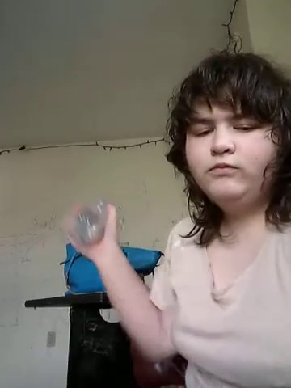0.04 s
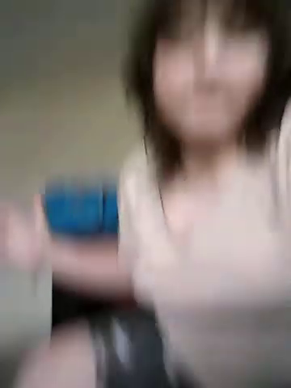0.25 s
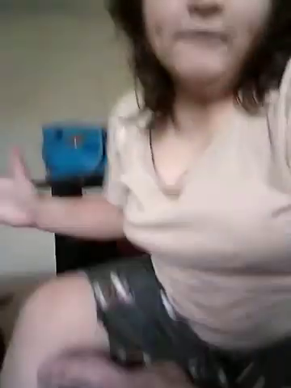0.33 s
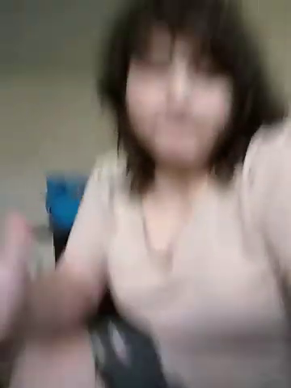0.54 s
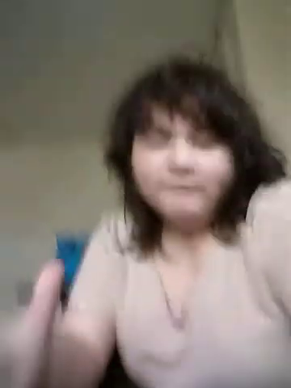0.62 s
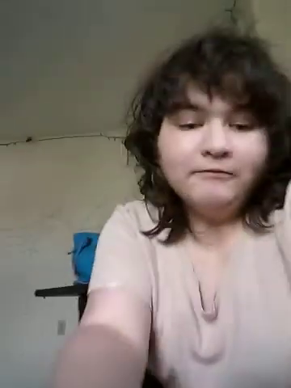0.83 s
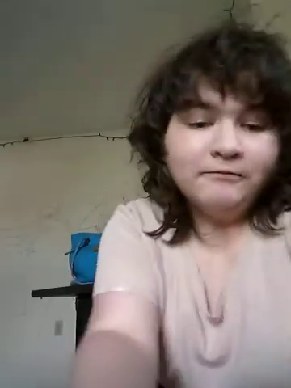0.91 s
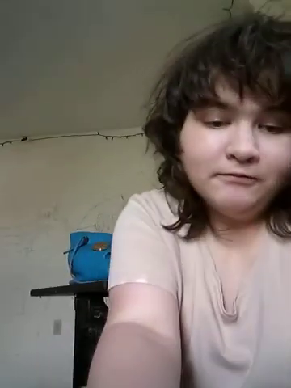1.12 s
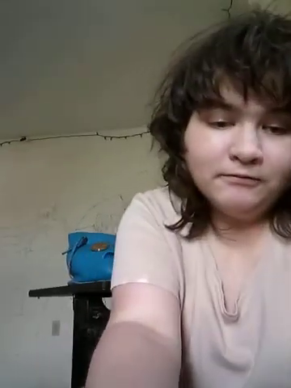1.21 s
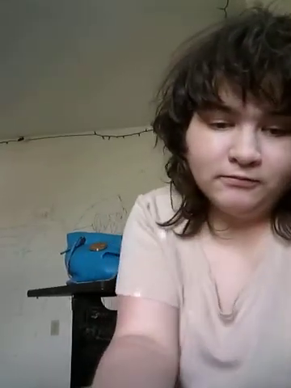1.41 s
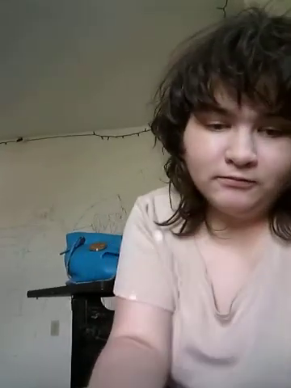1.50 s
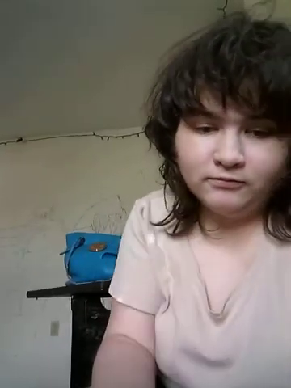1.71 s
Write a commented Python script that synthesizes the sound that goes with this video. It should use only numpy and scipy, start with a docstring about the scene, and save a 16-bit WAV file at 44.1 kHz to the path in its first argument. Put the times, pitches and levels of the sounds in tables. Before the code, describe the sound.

An empty plastic bottle is knocked and set down very close to a small microphone in a quiet room. Low hum and faint rustle open; at 0.18 s a loud hollow crack with boomy thumps and rattle lasts until about 0.28. A second clack comes at 0.38, lighter scraping clacks at 0.65-0.9, then soft taps near 1.18, 1.42 and 1.62 over much quieter room tone.

```python
"""A quiet room with a low hum and a faint rustle is heard first; then a light plastic bottle is knocked,
dragged and set down on the surface that carries a small microphone.
Room, rustle and scrapes are coloured noise under level curves. Hard contacts are short cracks plus
ringing wall modes, the support thumps with sagging tones, and the near sounds leave a short dull tail."""
import sys
import numpy as np
from scipy import signal
from scipy.fft import rfft, irfft
from scipy.io import wavfile
from scipy.ndimage import uniform_filter1d

SR = 44100
rng = np.random.default_rng(int(sys.argv[2]) if len(sys.argv) > 2 else 0)


def nominal_scale(level):
    """Amplitude ratio for a level in decibels (scalar or array-like)."""
    x = np.asarray(level, float) / 20
    return 10 ** x


def wrap_up_sound(samples):
    """Save the sound to the file named by the first command line argument, as 16-bit audio."""
    columns = np.atleast_2d(samples).T
    # keep every value between -1 and 1, then stretch to whole-number steps
    tamed = np.clip(columns, -1, 1)
    steps = np.round(tamed * 32767).astype(np.int16)
    wavfile.write(sys.argv[1], SR, steps)


N = 77175  # length in samples

# Background levels as heard; all three drop after the first knock.
# Each row: time in seconds, room tone in dB, its treble hiss in dB, the upper rustle in dB.
BACKGROUND_LEVEL = [(0.0, -34, -68, -49), (0.112, -31, -64.5, -48.5), (0.184, -34, -67, -47),
                    (0.272, -51.5, -85, -56), (0.38, -45.5, -79, -69.5), (0.448, -50.5, -82, -76),
                    (0.682, -44.5, -83.5, -70), (0.808, -42, -77, -57), (0.916, -47.5, -85, -65),
                    (1.106, -46, -81, -69), (1.33, -48, -82, -72), (1.466, -48.5, -80, -74.5),
                    (1.75, -53.5, -78.5, -78.5)]


def evened(x):
    """Scales to rms 1."""
    return x / np.sqrt(np.mean(x ** 2) + 1e-20)


def add(mix, start_s, sound):
    """Mixes a sound in at start_s seconds, cut off where the mix ends."""
    part = mix[round(start_s * SR):][:len(sound)]
    part += sound[:len(part)]


def colour(x, spectrum):
    """Filters x by a (Hz, dB) spectrum, drawn straight over log frequency."""
    point_hz, point_db = np.transpose(spectrum)
    hz = np.fft.rfftfreq(len(x), 1 / SR)
    db = np.interp(np.log(hz + 1), np.log(point_hz + 1), point_db, -120, -120)
    return irfft(rfft(x) * nominal_scale(db), len(x))


def level(curve, index):
    """One dB column of a level curve as gain, slightly smoothed; silent outside its times."""
    rows = np.array(curve)
    db = np.interp(np.arange(N) / SR, rows[:, 0], rows[:, index], -200, -200)
    return uniform_filter1d(nominal_scale(db), size=90)


def room_tone():
    """Low room noise, patchy in time and pitch, with a faint treble hiss."""
    # Colour of the low room noise. Each row: frequency in Hz, relative density in dB per Hz.
    room_spectrum = [(24, -34.5), (40, -17.5), (65, -1), (141, -9), (222, 1.5), (283, -11), (420, -11.5),
                     (543, -8), (632, -9.5), (747, -6.5), (1500, -26.5), (1950, -45), (3300, -120)]
    # Colour of the treble hiss. Each row: frequency in Hz, relative density in dB per Hz.
    hiss_spectrum = [(2940, -5), (5000, 10), (7400, -2), (8930, 10.5), (15100, 10), (16400, -26.5)]
    patch_db = 2  # rms unevenness
    low, high = rng.standard_normal((2, N))
    cells = signal.stft(colour(low, room_spectrum), nperseg=512)[2]
    patches = rng.standard_normal(cells.T.shape).T
    patches = uniform_filter1d(patches, size=8, axis=0)  # across frequency
    patches = evened(uniform_filter1d(patches, size=6, axis=1))  # across time
    tone = evened(signal.istft(cells * nominal_scale(patch_db * patches), nperseg=512)[1][:N])
    hiss = evened(colour(high, hiss_spectrum))
    return level(BACKGROUND_LEVEL, index=1) * tone + level(BACKGROUND_LEVEL, index=2) * hiss


def hum():
    """A low sine made slightly fuzzy by slow random changes of its strength."""
    # Hum level as heard. Each row: time in seconds, level in dB.
    hum_level = [(0.0, -39), (0.296, -37), (0.458, -50), (0.754, -51), (0.848, -54), (1.09, -55),
                 (1.452, -56), (1.75, -50)]
    pitch_hz, width_hz, fuzz_depth = 58, 5, 0.3
    pole = np.exp(-np.pi * width_hz / SR)
    fuzz = rng.standard_normal(N)
    for _ in range(2):  # two gentle low-passes in a row
        fuzz = signal.lfilter([1 - pole], [1, -pole], fuzz)
    tone = np.sin(2 * np.pi * pitch_hz * np.arange(N) / SR)
    return level(hum_level, index=1) * evened((1 + fuzz_depth * evened(fuzz)) * tone)


def rustle():
    """Upper background rustle: steady noise, coloured and shaped by a level curve."""
    # Colour of the rustle. Each row: frequency in Hz, relative density in dB per Hz.
    rustle_spectrum = [(760, -27), (1300, -1.5), (2120, 2), (2320, -8.5), (2570, 0), (2730, -4),
                       (3660, -8.5), (7500, -44.5), (9750, -65.5), (16500, -120)]
    noise = evened(colour(rng.standard_normal(N), rustle_spectrum))
    return level(BACKGROUND_LEVEL, index=3) * noise


def thumps():
    """The support swings low, its pitch sagging as it settles, with one weaker overtone."""
    # Thumps of the support.
    # Each row: start in seconds, level in dB, starting pitch in Hz, time to fall 60 dB in seconds.
    swings = [(.118, -30, 101, 0.055), (0.183, 1.5, 142, 0.019), (0.272, -11.5, 116, 0.049),
              (0.468, -27.5, 73, 0.11), (0.1896, -7, 89, 0.14), (0.2018, -0.5, 162, 0.034),
              (0.211, 0, 97, 0.053), (0.225, -4, 86.5, 0.082), (0.2433, -40, 160, 0.036),
              (0.2515, -1, 197, 0.051), (0.2555, -5, 139, 0.053), (0.3834, -6.5, 108, 0.081),
              (0.6448, -23, 295, 0.015), (0.7091, -16.5, 116, 0.15), (0.7175, -17.5, 78.7, .16),
              (.793, -30, 107.7, 0.13), (.849, -20, 88, 0.062), (1.107, -38, 120, 0.11),
              (1.187, -28.5, 298, 0.015), (1.416, -34, 243, 0.053), (1.479, -33.5, 161.6, 0.065),
              (1.6176, -25.5, 276.6, 0.042), (1.624, -26.5, 134, 0.047)]
    sag, sag_s = 0.25, 0.015  # share of the pitch lost; time constant
    overtone_ratio, overtone_db = 2.3, -17
    attack_s = 0.0012
    t, out = np.arange(SR // 3) / SR, np.zeros(N)
    for start_s, swing_db, start_hz, t60_s in swings:
        pitch_hz = start_hz * (1 - sag * (1 - np.exp(-t / sag_s)))
        phase = 2 * np.pi * np.cumsum(pitch_hz) / SR
        swing = np.sin(phase) + nominal_scale(overtone_db) * np.sin(overtone_ratio * phase)
        envelope = nominal_scale(swing_db - 60 * t / t60_s) * np.minimum(t / attack_s, 1)
        add(out, start_s, -envelope * swing)  # first swing goes downward
    return out


def ticks():
    """Each layer cracks with a spit of treble; wall modes near its ring centre swell just after and die."""
    # Cracks and rings of the hard contacts; one contact may take several rows, as layers.
    # Each row: start in seconds, crack level in dB, crack centre in Hz, ring peak in dB, ring centre in Hz,
    # ring length as a factor on the wall's own.
    layers = [(0.14, -30.5, 4260, -39.5, 3400, 1), (0.1825, -15, 1920, -19, 760, 1),
              (.1842, -7.5, 2050, -7.5, 960, 0.55), (0.1844, -13.5, 7200, -59.5, 960, .5),
              (.186, -12.5, 10000, -62, 960, 0.71), (0.1861, -10, 2700, -43, 960, 0.58),
              (0.19, -28, 2500, -33, 960, 0.17), (0.201, -35, 2540, -14.5, 756, 0.7),
              (0.2143, -13.5, 2200, -23.5, 1800, 0.13), (0.216, -18.5, 5600, -60, 960, 0.32),
              (0.26, -27, 4400, -12.5, 750, 0.38), (0.307, -49, 2480, -34.5, 990, 0.51),
              (.3786, -16, 2520, -29, 1800, 0.36), (0.3793, -14.5, 4300, -5, 955, 0.26),
              (.390, -29.5, 3200, -22, 960, 0.34), (0.3926, -55, 3270, -32, 1060, .6),
              (0.4044, -38.5, 3600, -28.5, 950, 0.83), (0.4266, -50, 3200, -29, 1060, 0.23),
              (0.4461, -56, 3200, -43, 1000, 0.55), (0.564, -55, 2460, -49, 1027, 0.55),
              (.6455, -79, 6200, -57, 1010, 0.31), (.647, -24.5, 1500, -24.5, 670, 0.22),
              (0.6524, -41, 1800, -33.5, 680, .4), (0.7092, -25.5, 4760, -10, 1112, 0.53),
              (0.707, -30, 2630, -24, 2600, 0.79), (0.728, -19, 3430, -23, 1100, 0.89),
              (0.736, -51, 2500, -28, 980, .5), (.738, -55, 7500, -56, 1000, .5),
              (.759, -43, 7500, -65, 1010, .5), (.766, -43, 2480, -57, 1000, .5),
              (0.784, -27.5, 3140, -15, 1140, 1), (0.7842, -23.5, 4000, -21.5, 1800, 0.2),
              (.784, -55, 2000, -14.5, 504, 0.33), (0.7921, -30, 3560, -25.5, 558, 1),
              (0.836, -51, 3000, -34, 1100, 0.87), (0.842, -22, 2780, -33, 1366, .5),
              (0.867, -37, 2800, -37, 2750, 0.42), (0.8886, -29, 2000, -51, 1800, 0.36),
              (0.892, -29.5, 3060, -46, 3200, 0.28), (0.9, -51, 2500, -40, 1800, 1),
              (.902, -39, 2860, -23, 2600, 0.33), (1.1835, -34.5, 1870, -32, 1160, 0.57),
              (1.2374, -47, 2160, -41, 1370, 0.25), (1.308, -51, 1020, -39, 803, 0.51),
              (1.4111, -44.5, 3200, -80, 1000, 0.36), (1.4175, -38.5, 1830, -30, 890, .4),
              (1.573, -62, 2360, -64, 1026, 0.36), (1.617, -39, 1800, -30.5, 990, 0.59),
              (1.658, -82, 1480, -54, 800, .5), (1.688, -57, 1410, -58, 800, .5),
              (1.737, -51.5, 1520, -54, 810, 0.35)]
    # Modes of the plastic wall.
    # Each row: frequency in Hz, relative weight in dB, ring length in seconds before the layer's factor.
    wall_modes = [(514.4, -7.5, 0.054), (589, 0, 0.041), (760, 11, 0.012), (960, -3, 0.014),
                  (1140, -5, 0.013), (1800, -10, 0.033), (2600, -5, 0.013), (3200, -7, 0.0046)]
    reach_oct = 0.23  # spread of the excited modes around the ring centre
    swell_share = 0.095  # time constant as a share of the ring length
    crack_cycles = 0.4  # time constant in cycles of the crack centre
    spit_db, spit_t60_s, spit_band_hz = -27, 0.006, (10000, 14500)

    t, out = np.arange(4096) / SR, np.zeros(N)
    band = signal.butter(2, spit_band_hz, "band", fs=SR, output="sos")
    spits = signal.sosfilt(band, rng.standard_normal((len(layers), 4096)))
    spits = spits * nominal_scale(spit_db - 60 * t / spit_t60_s)
    mode_hz, mode_db, mode_s = np.transpose(wall_modes)[:, :, None]
    for layer, spit in zip(layers, spits):
        start_s, crack_db, crack_hz, ring_db, ring_hz, length = layer
        weight = nominal_scale(mode_db) * np.exp(-(np.log2(mode_hz / ring_hz) / reach_oct) ** 2)
        u = t / (swell_share * mode_s * length)
        ring = (weight * u ** 2 * np.exp(-u) * np.sin(2 * np.pi * mode_hz * t)).sum(0)
        ring = ring / abs(ring).max()
        u = t * crack_hz / crack_cycles
        crack = -(u / 2) ** 2 * np.exp(2 - u) * np.sin(2 * np.pi * crack_hz * t)  # envelope peaks at 1
        add(out, start_s, nominal_scale(ring_db) * ring + nominal_scale(crack_db) * (crack + spit))
    return out


def slides():
    """Dense random grains of friction, coloured into a scrape with its treble fizz and a low rattle."""
    # Stretches of sliding, each a level curve.
    # Each row of a stretch: time in seconds, scrape in dB, low rattle in dB, treble fizz in dB.
    stretches = [
        [(.194, -54, -46, -64), (.199, -22.5, -12.5, -53), (.21, -29, -19, -58), (.222, -33, -24.5, -51),
         (.232, -24, -14.5, -46.5), (.25, -36, -21.5, -60), (.264, -39, -17.5, -58), (.28, -76, -40.5, -80),
         (.35, -80, -42.5, -87)],
        [(.384, -68, -25, -100), (.392, -64, -29, -91), (.41, -65, -40, -105), (.45, -68, -42.5, -98),
         (.53, -91.5, -72, -94)],
        [(.63, -57.5, -70, -88), (.658, -45.5, -47, -75), (.68, -38.5, -51, -51.5), (.695, -33, -29.5, -53),
         (.704, -29, -18.5, -50), (.716, -45, -31, -64), (.73, -36, -34, -78), (.745, -50, -37, -93),
         (.78, -58.5, -61, -90)],
        [(.782, -54, -42, -80), (.786, -39.5, -28.5, -51), (.8, -47, -45, -79), (.83, -72, -38.5, -90),
         (.842, -32, -33.5, -50.5), (.856, -53, -49, -69), (.87, -41.5, -40, -61), (.882, -61, -40.5, -85),
         (.892, -46, -38.5, -88), (.897, -54, -38, -84), (.904, -38.5, -41, -94), (.92, -65, -34, -85),
         (.95, -75, -69, -95)],
        [(1.17, -65, -67, -99), (1.188, -63, -41, -100), (1.21, -64, -66, -69), (1.25, -85, -62, -98)],
        [(1.58, -96, -92, -99), (1.63, -80, -45.5, -79), (1.7, -81, -49, -88.5), (1.75, -77.5, -43.5, -80)],
    ]
    # Colour of the scrape. Each row: frequency in Hz, relative density in dB per Hz.
    scrape_spectrum = [(530, -47), (900, -1.5), (1130, 0.5), (1260, -9), (1670, 0.5), (2470, -7),
                       (3120, -3.5), (7500, -34.5), (9750, -69), (16500, -120)]
    # Colour of the low rattle. Each row: frequency in Hz, relative density in dB per Hz.
    rattle_spectrum = [(76, -29), (130, 2.5), (277, -0.5), (528, -6), (846, -14), (1500, -16.5),
                       (1950, -40.5), (3300, -120)]
    # Colour of the treble fizz. Each row: frequency in Hz, relative density in dB per Hz.
    fizz_spectrum = [(3820, -35.5), (6500, -4.5), (12800, 3.5), (13900, 2), (15700, 1.5), (16400, -14)]
    grains_per_s, spread_db = 14000, 1.5
    size = nominal_scale(spread_db * np.minimum(rng.exponential(1, (2, N)), 5))
    present = rng.random((2, N)) < grains_per_s / SR
    treble_grains, low_grains = size * rng.standard_normal((2, N)) * present
    scrape = evened(colour(treble_grains, scrape_spectrum))
    rattle = evened(colour(low_grains, rattle_spectrum))
    fizz = evened(colour(treble_grains, fizz_spectrum))  # same grains as the scrape
    out = np.zeros(N)
    for stretch in stretches:
        out += level(stretch, index=1) * scrape
        out += level(stretch, index=2) * rattle
        out += level(stretch, index=3) * fizz
    return out


def echoes(x):
    """A short dull tail from the walls: x convolved with decaying low-passed noise."""
    echo_db, t60_s, gap_s, dull_hz = -37.5, 0.16, 0.003, 2500
    t = np.arange(SR // 4) / SR
    tail = rng.standard_normal(len(t)) * nominal_scale(-60 * t / t60_s) * (t > gap_s)
    tail = signal.sosfilt(signal.butter(2, dull_hz, fs=SR, output="sos"), tail)
    return nominal_scale(echo_db) * signal.fftconvolve(x, tail / np.linalg.norm(tail))[:N]


def scene():
    """All sources in one channel; only ticks and slides feed the echoes."""
    background = room_tone() + hum() + rustle()
    near = ticks() + slides()
    return (background + thumps() + near + echoes(near))[None]


def low_pass(x):
    """Removes everything above the highest recorded frequency."""
    return signal.sosfilt(signal.butter(12, 16500, fs=SR, output="sos"), x)


def record(dry):
    """Cuts the deepest lows and everything above the treble edge."""
    low_cut_hz, treble_edge_hz = 43, 16300
    x = signal.sosfilt(signal.butter(4, low_cut_hz, "high", fs=SR, output="sos"), dry)
    edge = signal.firwin(511, treble_edge_hz, window=("kaiser", 9), fs=SR)
    finished = signal.oaconvolve(x, edge[None], "same")
    return low_pass(finished)


dry = scene()
out = record(dry)
wrap_up_sound(out)
```